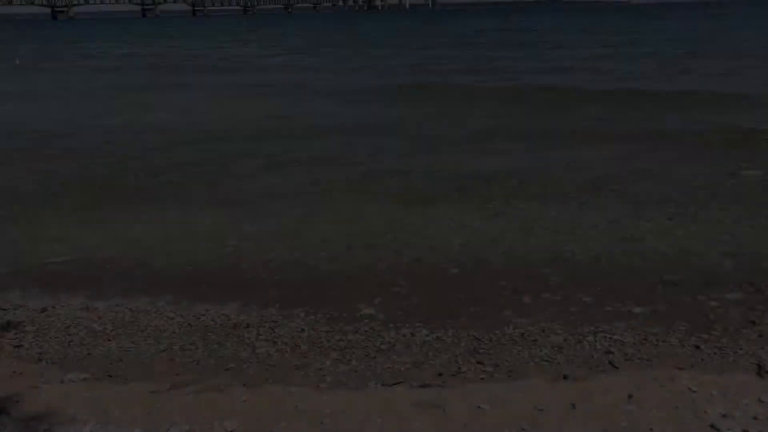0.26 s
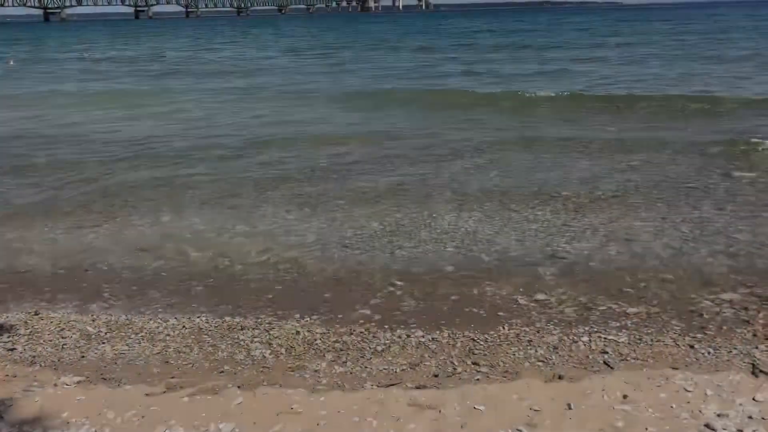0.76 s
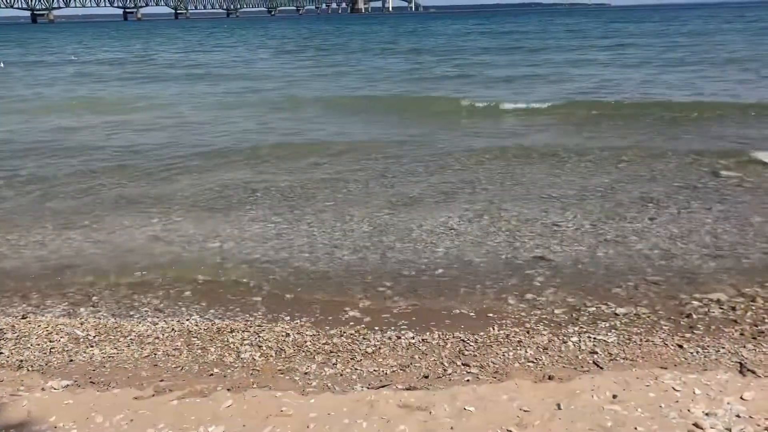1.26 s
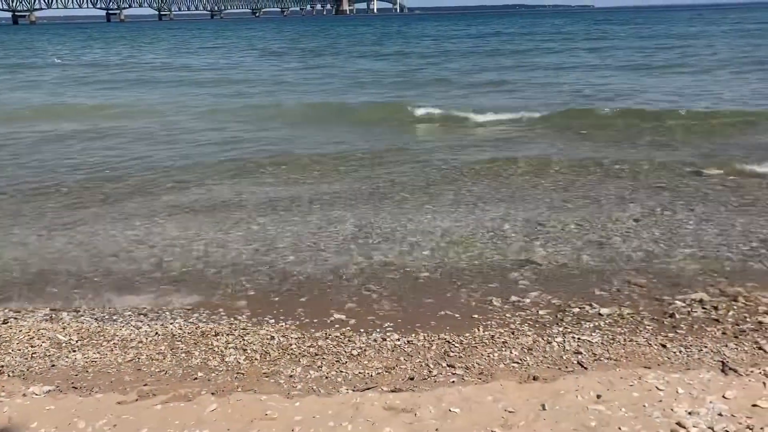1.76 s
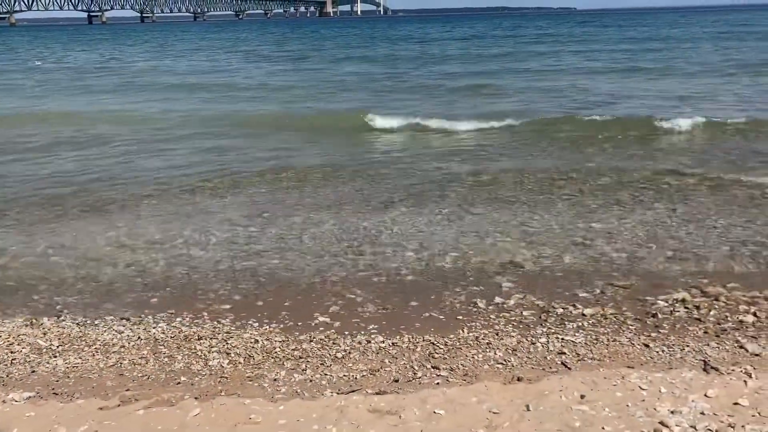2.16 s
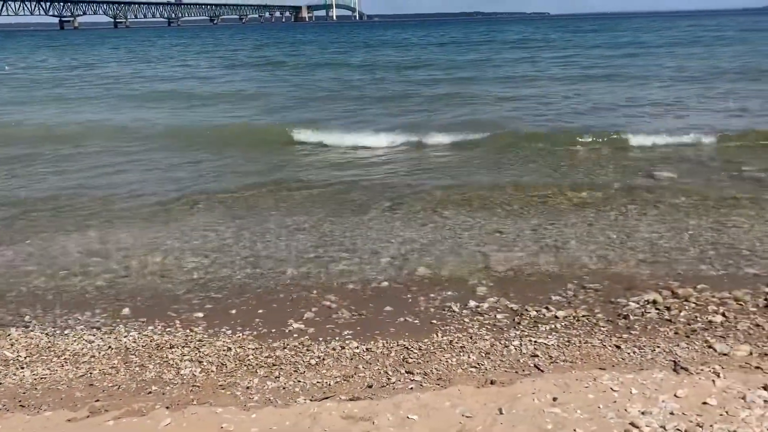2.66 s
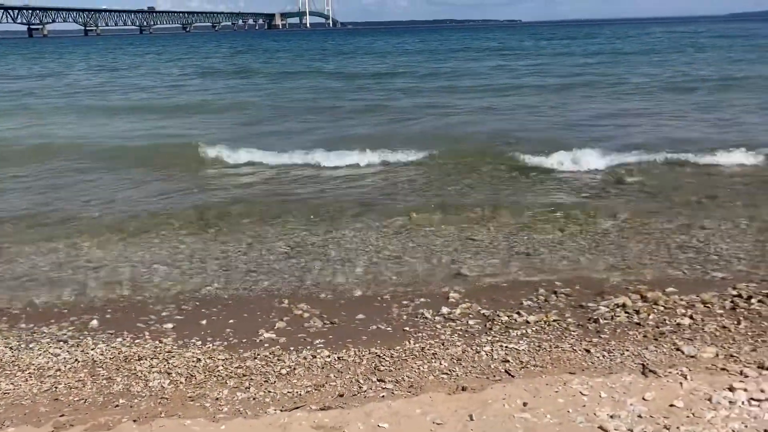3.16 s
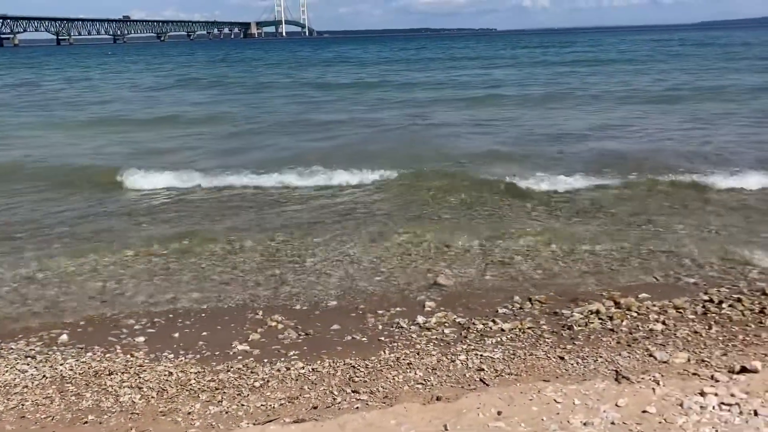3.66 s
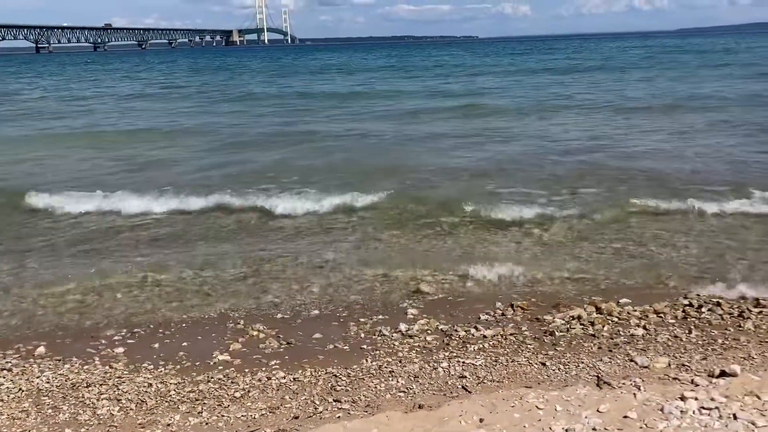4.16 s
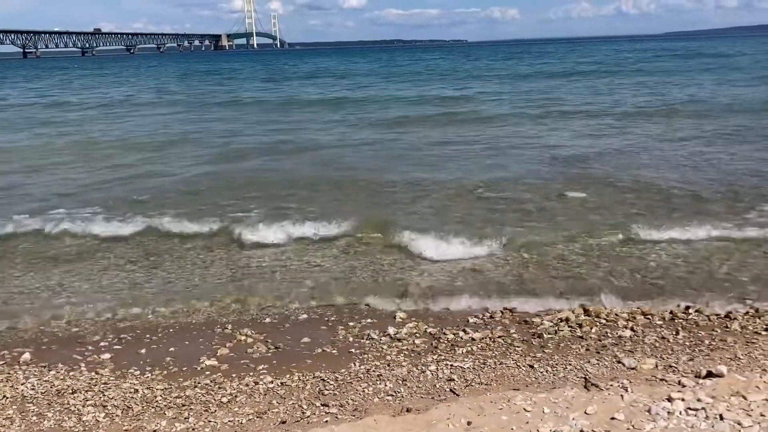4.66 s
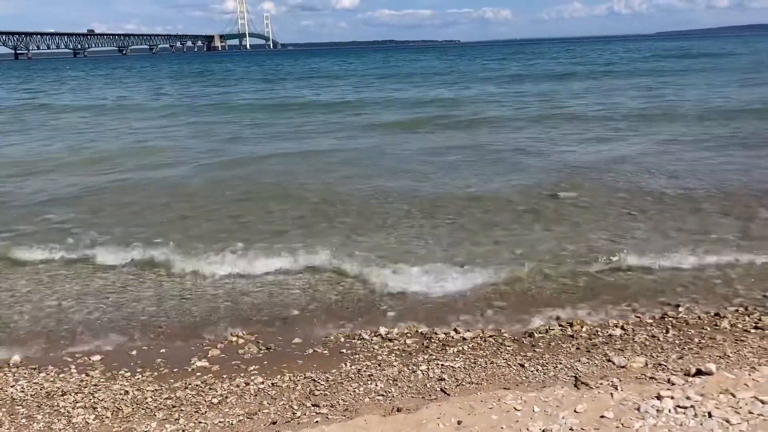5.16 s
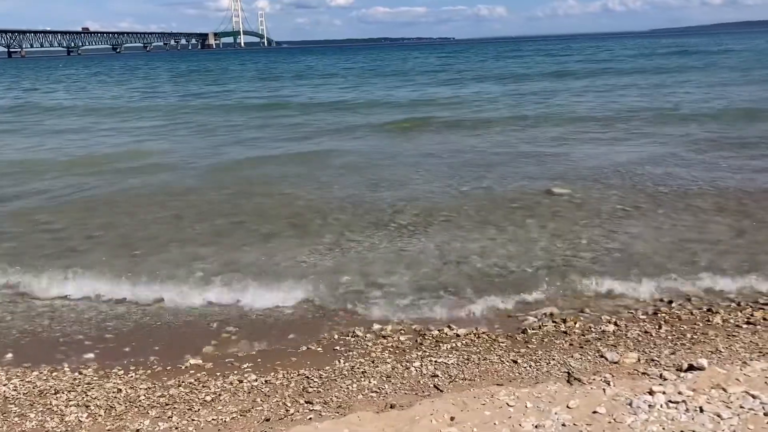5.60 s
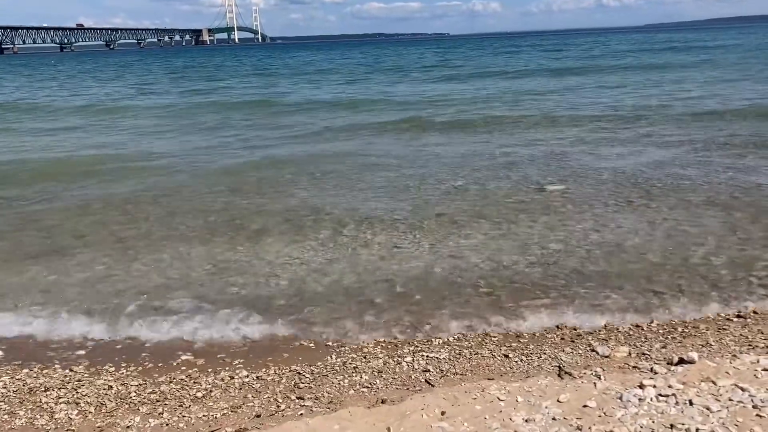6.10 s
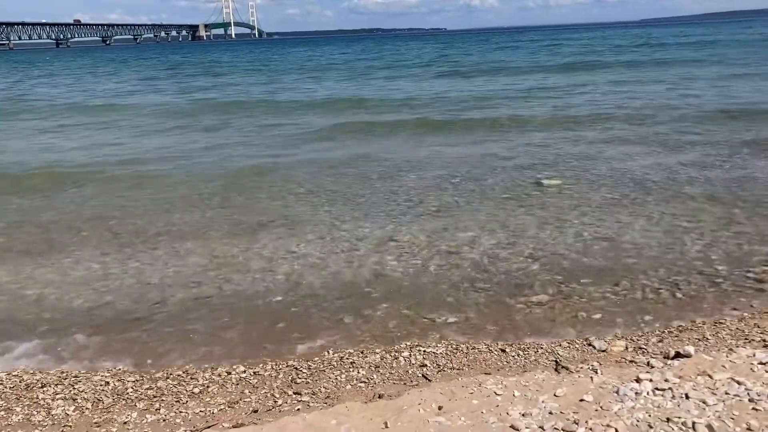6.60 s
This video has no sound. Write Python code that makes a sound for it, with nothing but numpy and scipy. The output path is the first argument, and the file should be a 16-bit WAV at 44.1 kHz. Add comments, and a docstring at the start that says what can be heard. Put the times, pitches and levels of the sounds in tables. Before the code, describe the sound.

From silence, the sound fades in steadily over about 0.75 seconds: small waves on an open pebble shore, heard close by a phone in stereo. A low, uneven rumble of water and wind buffeting continues throughout, with short soft thumps. Above it runs a broad, patchy rush with fine ringing grain, and airy foam fizzes high among the stones. A gentle swell peaks near 1.3 seconds, with a few bubbles. Around 2.9 to 3.4 seconds quicker washes overlap, with light spray slaps and bubble plops. From 4 to 6 seconds a low breaker tumbles in front, densely gurgling; a strong hollow gulp comes around 4.6, followed by many smaller bubbles. Another wash runs up around 5.5 to 6 seconds, with slaps until 6.1. Then water drains, foam softens, and surf on the left leads to the end, just under 7 seconds.

```python
"""Small waves on a pebble shore, heard by a phone with two spaced microphones; the sound fades in first.
From the start a low rumble of water and wind, surf far along the beach to both sides and foam fizzing
among the stones, all made of shaped noise; surf and foam also hold crowds of tiny rings. Soon come
short low thumps in the rumble and ringing big bubbles, then spray slapping the stones from about 2.9 s.
A low breaker in front is strongest from 4 to 6 s, and the surf on the left leads at the end."""
import sys
import numpy as np
from scipy import signal
from scipy.fft import rfft, irfft
from scipy.io import wavfile
from scipy.ndimage import uniform_filter1d, map_coordinates

SR = 44100
rng = np.random.default_rng(int(sys.argv[2]) if len(sys.argv) > 2 else 0)


def file_out(sig):
    """Save sig as 16-bit WAV at sys.argv[1]."""
    # one column per channel
    cols = np.atleast_2d(sig).T
    # limit, then scale
    lim = np.clip(cols, -1, 1)
    pcm = np.round(lim * 32767).astype(np.int16)
    wavfile.write(sys.argv[1], SR, pcm)


N = 301644
SIZE = 512  # samples in a short-time frame


def amp(db):
    """Gain of a level in dB."""
    return 10 ** (np.asarray(db) / 20)


def unit(x):
    """Scaled to rms 1."""
    return x / np.sqrt(np.mean(np.abs(x) ** 2) + 1e-20)


def frames(x):
    """Short-time spectra."""
    return signal.stft(x, SR, nperseg=SIZE, noverlap=SIZE * 3 // 4)[2]


def sound(z):
    """Samples of short-time spectra."""
    return signal.istft(z, SR, nperseg=SIZE, noverlap=SIZE * 3 // 4)[1][..., :N]


HZ, TIMES = signal.stft(np.zeros(N), SR, nperseg=SIZE, noverlap=SIZE * 3 // 4)[:2]
HZ = HZ[:, None]


def along(points, hz):
    """Values at hz between (f/Hz, value) points, on a log axis."""
    f, v = np.transpose(points)
    return np.interp(np.log(hz + 1), np.log(f + 1), v)


def curves(rows, times):
    """One value per moment for each column after the time."""
    s, *cols = np.transpose(rows)
    return [np.interp(times, s, c) for c in cols]


def wobble(times, rate):
    """A smooth random curve, rate knots a second."""
    return map_coordinates(rng.standard_normal(200), [times * rate])


def patches(db, tall, long):
    """Random gain field with an rms depth in dB, smooth over tall bins and long frames."""
    field = rng.standard_normal((len(HZ), len(TIMES)))
    for _ in range(2):
        field = uniform_filter1d(field, max(int(tall), 1), 0)
        field = uniform_filter1d(field, max(int(long), 1), 1)
    return amp(db * unit(field))


def rings(times, db, hz, cycles, rise, size):
    """Each ring swells over some cycles, dies away and glides in pitch (up where rise is positive)."""
    u = np.arange(size) / SR * hz[:, None] / cycles
    envelope = u * np.exp(1 - u) * np.linspace(1, 0, size) ** .5
    ring = envelope * np.sin(2 * np.pi * cycles * (u + rise * u * u / 2))
    at = (times * SR).astype(int)[:, None] + np.arange(size)
    return np.bincount(at.ravel(), (amp(db)[:, None] * ring).ravel(), N + size)[:N]


def swarm(count, hz, spread, cycles, scatter_db, size):
    """A crowd of rings with scattered moments, levels and pitches, of rms 1."""
    when, loud, tone = rng.random(count), rng.standard_normal(count), rng.standard_normal(count)
    pitch = np.clip(hz * np.exp(spread * tone), hz / 2.48, 16000)
    level_db = scatter_db * loud.clip(-2, 2)
    return unit(rings(when * N / SR, level_db, pitch, cycles, rise=0.0932, size=size))


def spaced(z, turn):
    """Two channels: the left one ahead by the phase turn in radians."""
    return np.array([z * np.exp(.5j * turn), z * np.exp(-.5j * turn)])


def low_noise(spectrum, apart_db, rate, lumpy_db):
    """Low noise of rms 1 with random lumps in level, nearly the same in both channels."""
    gain = amp(along(spectrum, np.fft.rfftfreq(N, 1 / SR)))
    mid, side = irfft(rfft(rng.standard_normal((2, N))) * gain, N)
    lumps = wobble(np.arange(N) / SR, rate)
    pair = np.array([mid + amp(apart_db) * side, mid - amp(apart_db) * side])
    lean = amp([[-.4], [.4]])  # a little stronger on the right
    return unit(amp(lumpy_db * lumps) * pair * lean)


# course of the water's drone: t/s, level/dB
DRONE_LEVEL = [(0, -40), (.55, -41), (.85, -38), (1.2, -37), (1.7, -38.5), (2.2, -38.5), (2.7, -36.5),
               (3.4, -38), (4, -40), (4.5, -38.5), (5.2, -40), (6.1, -38.5), (6.55, -37.5), (6.84, -36.5)]
# spectrum of the drone: f/Hz, level/dB
DRONE_SPECTRUM = [(40, -62), (80, -23), (120, -0.5), (200, -0.5), (300, -5), (450, -12.5), (580, -39),
                  (990, -120)]


def drone(t):
    """Heaving water drones as lumpy low noise."""
    level_db = curves(DRONE_LEVEL, t)[0]
    return amp(level_db) * low_noise(DRONE_SPECTRUM, apart_db=-12.0, rate=15, lumpy_db=1.14)


# strength of the wind before the quick gusts: t/s, level/dB
WIND_LEVEL = [(0, -41), (.35, -36.5), (.9, -40), (1.3, -39.5), (1.9, -38.5), (2.4, -40.5), (3, -39.5),
              (3.5, -38), (4, -37), (4.4, -38), (4.75, -39.5), (5.2, -36.5), (5.6, -39), (6, -42),
              (6.4, -41.5), (6.65, -37), (6.84, -43.5)]
# spectrum of the wind's buffeting: f/Hz, level/dB
WIND_SPECTRUM = [(15, -47), (28, -28), (40, -22), (50, -9), (68, -4.5), (95, -7), (130, -17.5), (200, -17),
                 (400, -120)]
GUST_DB = 0.4  # scale of the quick gusts


def wind(t):
    """Wind buffets as low noise whose level follows slow strength and quick gusts."""
    level_db = curves(WIND_LEVEL, t)[0] + GUST_DB * wobble(t, rate=3.04)
    return amp(level_db) * low_noise(WIND_SPECTRUM, apart_db=-13.5, rate=25, lumpy_db=0.0)


# waves running up the stones: crest t/s, rise time/s, fall time/s, swell level/dB
WAVES_UP = [(1.35, .5, 0.48, 2), (2.92, 0.3, 0.071, 1.5), (3.17, 0.2, 0.12, 2.5), (3.34, 0.085, 0.097, 0.5),
            (4.6, 0.12, 0.68, 2.5), (5.55, 0.16, 0.27, 1.5), (5.95, 0.29, 0.51, 3.5)]


def swell(times):
    """Each wave builds up to its crest and drains away, in dB."""
    total_db = 0
    for crest, rise, fall, db in WAVES_UP:
        span = np.where(times < crest, rise, fall)
        total_db = total_db + db * np.exp(-((times - crest) / span) ** 2)
    return total_db


# spectrum of the rushing water: f/Hz, level/dB
RUSH_SPECTRUM = [(120, -48), (300, -11.5), (600, -2), (1000, -5.5), (1350, -6), (1750, -9), (2300, -12),
                 (2900, -12), (3500, -13.5), (5000, -17), (7000, -42), (12000, -77)]


def hiss():
    """Rushing water as patchy noise, in short-time spectra of rms 1."""
    texture = patches(1.1, 7, 4) * patches(3.2, 1, 9)
    return unit(frames(rng.standard_normal(N)) * texture * amp(along(RUSH_SPECTRUM, HZ)))


def grain():
    """Fine ringing grain in the rushing water."""
    return unit(frames(swarm(count=1600, hz=1892, spread=.55, cycles=16.9, scatter_db=3.0, size=1300)))


def churn():
    """Lower, denser bubbles tumbling in the breaker."""
    return unit(frames(swarm(count=6000, hz=1103, spread=0.605, cycles=4.22, scatter_db=6.0, size=800)))


def crackle():
    """Very short clicks that barely ring."""
    return unit(frames(swarm(count=2500, hz=2645, spread=0.453, cycles=1.0, scatter_db=3.5, size=200)))


# stretches of shore: t/s, power share of right surf, of left surf, of the breaker in front,
# right-left delay of right surf/ms, drift of the left surf's delay/ms, delay of the breaker/ms
STRETCHES = [(0, 0.58, 0.15, 0.044, -0.25, -0.047, -0.18), (.7, 0.57, 0.19, 0.02, -0.28, 0.059, -0.37),
             (1.3, 0.22, 0.37, 0.054, -0.25, 0.052, -0.19), (1.8, 0.54, 0.1, 0.056, -0.27, 0.1, -0.16),
             (2.15, 0.079, 0.3, 0, -0.26, 0.061, -.1), (2.6, 0.12, 0.16, 0.24, -0.21, 0.067, -0.044),
             (3, 0, 0.35, 0.02, -0.25, 0.11, -0.028), (3.3, 0.3, 0.34, 0.4, -.16, 0.074, -0.081),
             (3.55, 0.56, 0.073, 0.064, -0.14, 0.079, 0.03), (3.85, 0.4, 0.037, 0.13, -0.19, 0.027, 0.081),
             (4.15, 0.48, 0.035, 0.29, -0.17, 0, 0.051), (4.5, 0.25, .03, 0.62, -0.22, -0.0071, 0.032),
             (4.75, 0.26, 0.065, 0.69, -0.26, -0.018, 0.045), (5.1, 0.41, 0.026, 0.5, -0.19, 0, 0.1),
             (5.5, 0.57, 0.025, 0.29, -0.15, 0, 0.035), (5.8, 0.35, .03, 0.56, -0.22, -0.012, -0.072),
             (6.15, 0.032, 0.16, 0.23, -0.24, 0.0039, -0.042), (6.45, 0.32, 0.44, 0, -0.16, 0.018, -0.077),
             (6.84, 0.083, 0.65, 0.024, -0.19, 0.0024, 0)]
# right-left delay of the left surf, where sound bends round the phone: f/Hz, delay/ms
LEFT_DELAY = [(500, .3), (1700, .3), (2750, .365), (3600, .415), (6000, .43)]
UNLIKE_S = 0.0011  # sets how fast the surrounding sound grows unlike between channels as f rises


def shore():
    """Far surf right and left, the breaker in front and the rest from all around, in two channels."""
    right, left, near, right_ms, drift_ms, near_ms = curves(STRETCHES, TIMES)
    around = np.clip(1 - right - left - near, .02, 1)
    right_surf = unit(hiss() + amp(-12) * crackle() + amp(-9.5) * grain())
    left_surf = unit(hiss() + amp(-12) * crackle() + amp(-11.0) * grain())
    breaker = unit(hiss() + amp(-12) * crackle() + amp(-5.5) * churn() + amp(-9) * grain())
    # sound from all around is alike in both channels only at low frequencies
    turn = np.arccos(np.sinc(2 * HZ * UNLIKE_S)) / 2
    mid, side = hiss() * np.cos(turn), hiss() * np.sin(turn)
    pair = np.sqrt(around) * np.array([mid + side, mid - side])
    left_ms = along(LEFT_DELAY, HZ) + drift_ms
    parts = [(right, right_surf, right_ms), (left, left_surf, left_ms), (near, breaker, near_ms)]
    for share, z, ms in parts:
        pair = pair + np.sqrt(share.clip(0)) * spaced(z, 2 * np.pi * HZ * ms / 1000)
    return unit(sound(pair))


# slow colour of the water: t/s, upper mids over the rush level/dB, low treble over the rush level/dB,
# foam level change/dB
WATER_COLOUR = [(0, 2.5, -4.5, -0.5), (.3, 2.5, -4.5, -1.5), (.6, 0.5, -2, -1.5), (1.2, 2.5, -3, 1),
                (1.65, 2.5, -1.5, 2), (2.1, 0, 0.5, 1), (2.7, 2, -1.5, 0.5), (2.95, 3.5, -4.5, 1),
                (3.1, 2.5, -4, 1.5), (3.3, 1.5, -1.5, 1), (3.4, 1.5, -5, 1.5), (3.5, 2, -3, -1),
                (3.85, 3, -5.5, 0.5), (4.22, 5, -7, 1), (4.36, 4, -2, 1.5), (4.7, 2, -3, 1.5),
                (4.9, 1, -1, 1.5), (5.1, 0.5, 1.5, 2), (5.22, 2, 0, 3), (5.31, 0.5, -2, 0),
                (5.5, -1, -1, 2), (5.58, 0.5, -2.5, 0.5), (5.7, -1, -1, 1), (5.95, 2, -2, 1.5),
                (6.1, 1, -1, 1.5), (6.25, 0, -0.5, -0.5), (6.5, 0.5, -1.5, -2), (6.6, 0.5, -1, -4),
                (6.84, 3, -3.5, -1)]
WASH_DB = -36  # level between waves, before the colour, the lapping and the lean


def rush():
    """The shore's water swells with the waves while its upper mids and treble shift."""
    bright_db, sizzle_db, _ = curves(WATER_COLOUR, TIMES)
    octaves = np.clip(np.log2((HZ + 1) / 1100), 0, 1)  # upper mids, in full from 2200 Hz
    thin = np.clip((HZ - 2500) / 500, 0, 1)  # thin sheets over the stones sizzle above the rush
    level_db = WASH_DB + swell(TIMES) + bright_db * octaves + sizzle_db * thin
    return frames(shore()) * amp(level_db)


# spectrum of the foam: f/Hz, level/dB
FOAM_SPECTRUM = [(2500, -53), (4500, -8), (6200, -0.5), (8500, -1), (10500, 0.5), (12500, -4),
                 (14200, -10.5), (16000, -10)]
FIZZ_DB, FIZZ_GROWS = -44, 0.34  # base level; share of the swell that the foam follows


def fizz(t):
    """Foam bursts between the stones: the same sound in both channels, the left one later."""
    bursts = swarm(count=7000, hz=8900, spread=0.352, cycles=1.5, scatter_db=4.5, size=150)
    spray = rng.standard_normal(N) + amp(-10) * bursts
    shape = amp(along(FOAM_SPECTRUM, HZ)) * patches(0.49, 69, 12.5) * patches(1.9, 3.5, 8.5)
    # a delay of 1/4400 s, with both channels in phase at 7000 Hz
    pair = spaced(frames(spray), -2 * np.pi * (HZ - 7000) / 4400)
    foam_db = FIZZ_DB + FIZZ_GROWS * swell(t) + curves(WATER_COLOUR, t)[2] + 0.21 * wobble(t, rate=5.8)
    return amp(foam_db) * unit(sound(pair * shape))


# short low thumps in the rumble: t/s, nominal peak level/dB, f/Hz
LOW_THUMPS = [(0.561, -34, 150), (1.1, -33, 72.4), (1.28, -30, 72), (1.445, -32, 80), (2.05, -39, 68),
              (2.496, -31, 78.4), (2.776, -30, 84.5), (3.04, -29, 80), (3.508, -28, 79), (4.353, -27, 83),
              (4.55, -28, 82), (4.88, -31, 67), (5.33, -32, 69), (5.68, -34, 80), (6.3, -31, 69.4),
              (6.528, -34, 105)]


def thumps():
    """Each thump in the rumble is a short low ring that sinks slightly in pitch."""
    return rings(*np.transpose(LOW_THUMPS), cycles=1.1, rise=-0.022, size=6000)


# big bubbles ringing out of the wash: t/s, nominal peak level/dB before lapping and lean, f/Hz
BIG_BUBBLES = [(.99, -31, 2210), (1.583, -38, 1360), (1.699, -34, 1660), (2.071, -39, 1230),
               (2.592, -35, 810), (2.916, -40, 2450), (3.174, -32, 755), (3.298, -35, 2130),
               (3.345, -32, 810), (3.825, -34, 2160), (4.054, -34, 2230), (4.522, -26.5, 653),
               (4.563, -32.5, 1144), (4.64, -24, 800), (4.739, -33, 900), (4.797, -33, 1300),
               (4.856, -32, 2260), (4.893, -35, 1210), (4.941, -32, 870), (4.963, -29, 343),
               (5.005, -34, 690), (5.048, -32, 734), (5.07, -34, 560), (5.076, -34, 2040),
               (5.157, -31, 735), (5.359, -32, 640), (5.408, -30.5, 1310), (5.535, -36, 1180),
               (5.566, -31, 1450), (5.6, -31, 874), (5.652, -36, 608), (5.705, -29.5, 536),
               (5.79, -33, 710), (5.975, -31, 570), (6.015, -40, 1570), (6.029, -36, 2825),
               (6.04, -34, 1240), (6.089, -42, 3300), (6.241, -36, 810), (6.258, -37, 1320)]


def gulps():
    """Each big bubble swells for 2.8 ms plus 0.66 of a cycle, then rings away."""
    s, db, hz = np.transpose(BIG_BUBBLES)
    cycles = 0.0028 * hz[:, None] + 0.66
    return frames(rings(s, db, hz, cycles=cycles, rise=0.02, size=3000))


# water slapping the stones: t/s, nominal peak level/dB before lapping and lean, f/Hz of the spray
STONE_SLAPS = [(2.895, -38, 3300), (2.968, -38, 3500), (3.095, -41, 2200), (3.419, -42, 2000),
               (3.72, -45, 2000), (3.897, -35, 2200), (4.446, -32, 2500), (4.493, -43, 3000),
               (4.593, -38, 2800), (4.826, -33, 1990), (5.635, -43, 2200), (5.767, -38, 2000),
               (5.825, -36, 3000), (5.892, -40, 3500), (6.0, -40, 3000), (6.093, -32, 3300)]
SLAP_RISE_S, SLAP_FALL_S, SLAP_OCTAVES = .0022, 0.005, 0.3  # time constants; width of the band


def slaps():
    """Each slap is a short burst of spray, noise centred on its pitch."""
    s, db, hz = np.transpose(STONE_SLAPS)[:, :, None, None]
    late = TIMES - s
    burst = np.exp(np.where(late < 0, late / SLAP_RISE_S, -late / SLAP_FALL_S))
    band = np.exp(-(np.log2((HZ + 1) / hz) / SLAP_OCTAVES) ** 2 / 2)
    band = band / np.sqrt(np.mean(band ** 2, axis=1, keepdims=True))
    return frames(rng.standard_normal(N)) * np.sum(amp(db) * burst * band, axis=0)


def wash():
    """The rush, with big bubbles and slaps arriving from the breaker's direction."""
    near_ms = curves(STRETCHES, TIMES)[5]
    splashes = spaced(gulps() + slaps(), 2 * np.pi * HZ * near_ms / 1000)
    lean = amp([[0.6], [-0.6]])  # a little stronger on the left
    return sound(rush() + splashes) * lean


def scene():
    """All the water and the wind; wash and foam share a quick unevenness."""
    t = np.arange(N) / SR
    rumble = drone(t) + wind(t) + thumps()
    lapping = amp(0.34 * wobble(t, rate=9))
    return rumble + lapping * (wash() + fizz(t))


FADE_FROM_S, FADE_S, TOP_HZ = 0.0038, 0.76, 15800


def record(dry):
    """A straight fade-in, and nothing above the band limit."""
    faded = dry * np.clip((np.arange(N) / SR - FADE_FROM_S) / FADE_S, 0, 1)
    padded = N + 4096  # silence keeps the filter from wrapping the end into the start
    keep = np.fft.rfftfreq(padded, 1 / SR) < TOP_HZ
    return irfft(rfft(faded, padded) * keep, padded)[:, :N]


dry = scene()
out = record(dry)
file_out(out)
```